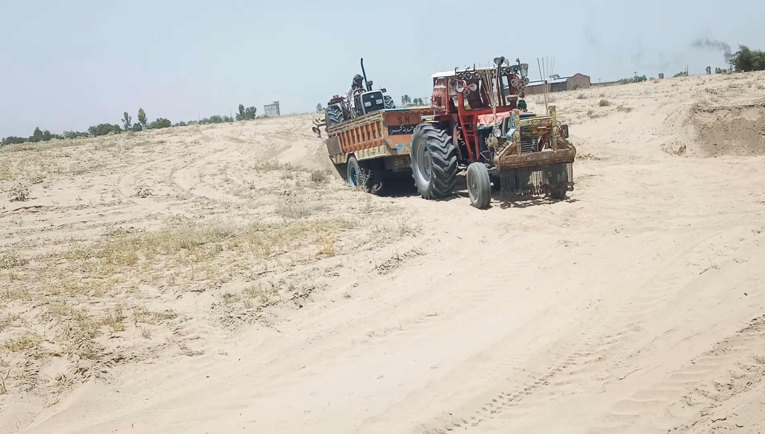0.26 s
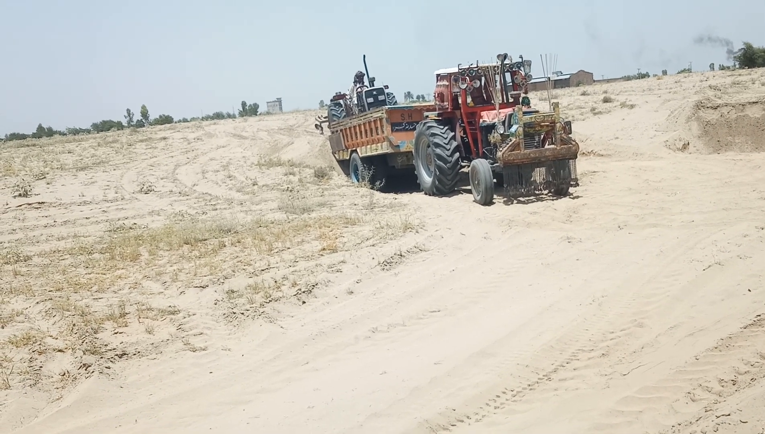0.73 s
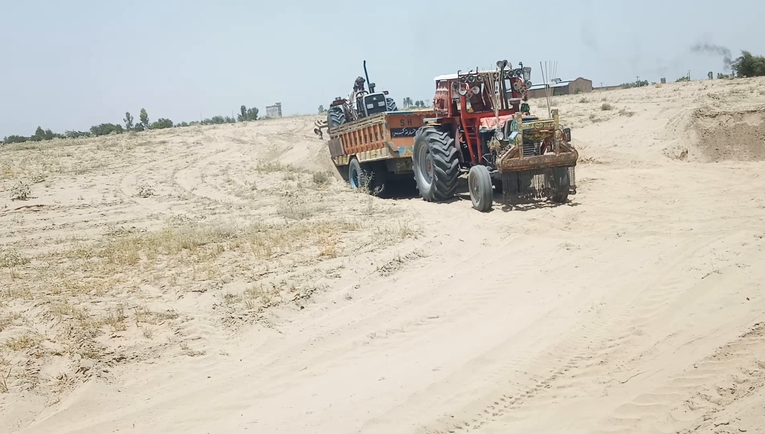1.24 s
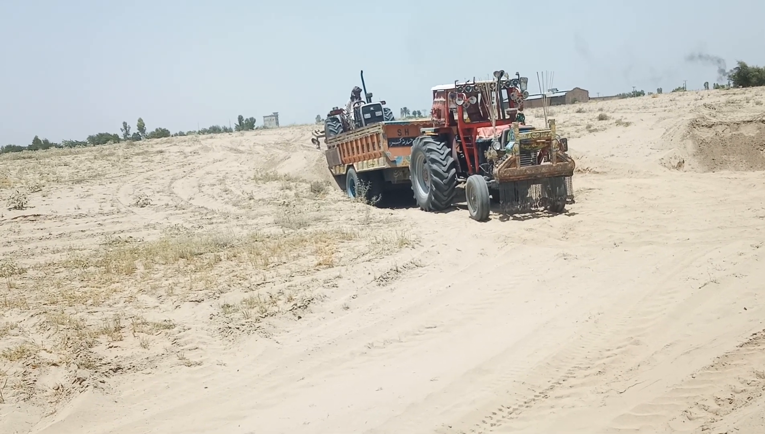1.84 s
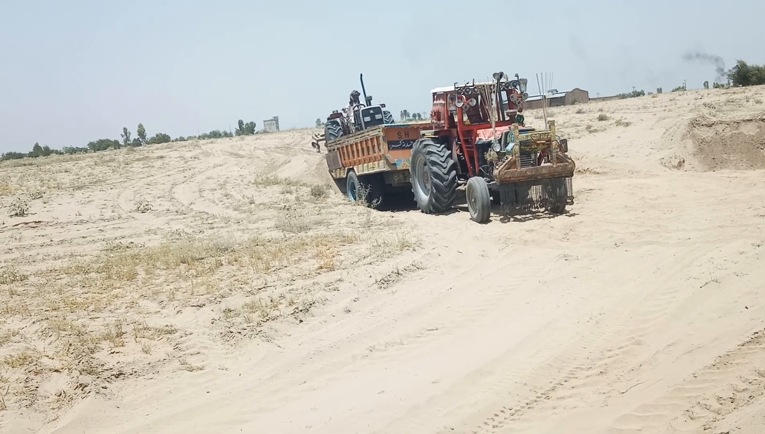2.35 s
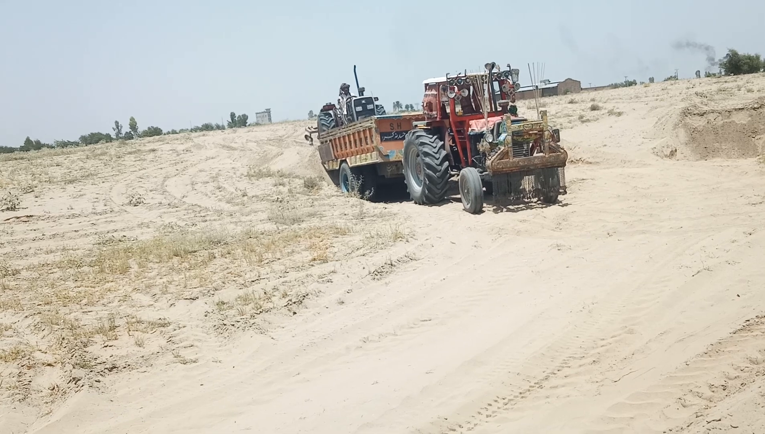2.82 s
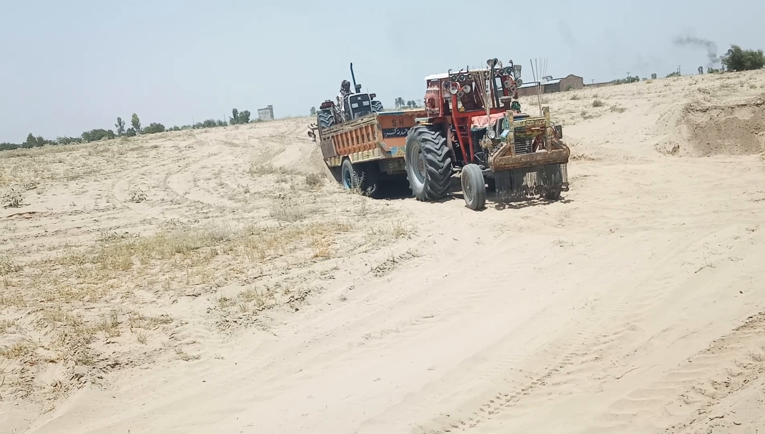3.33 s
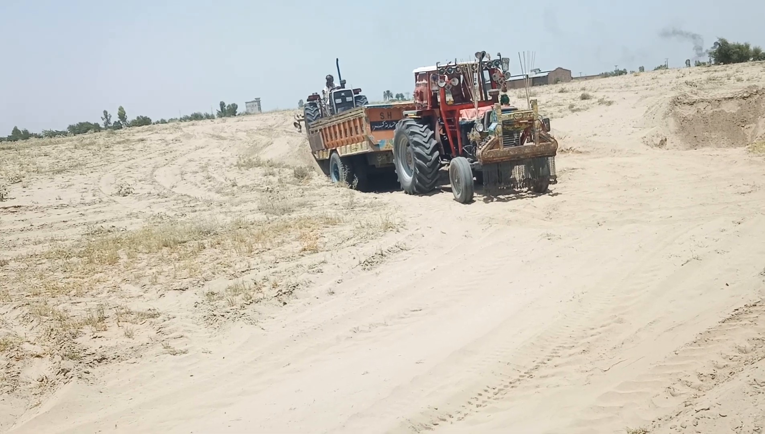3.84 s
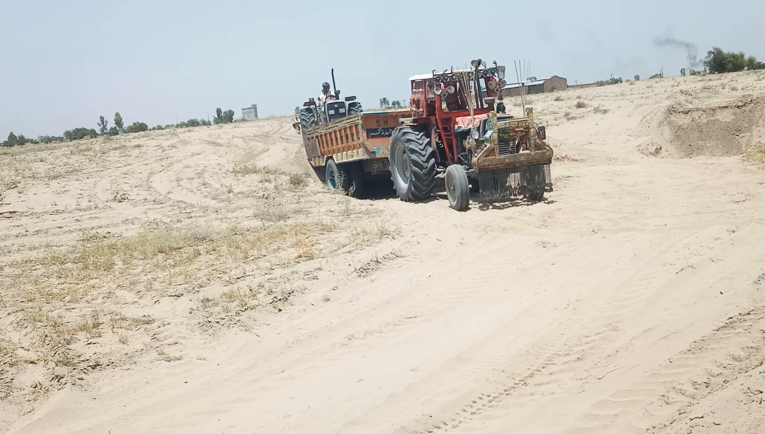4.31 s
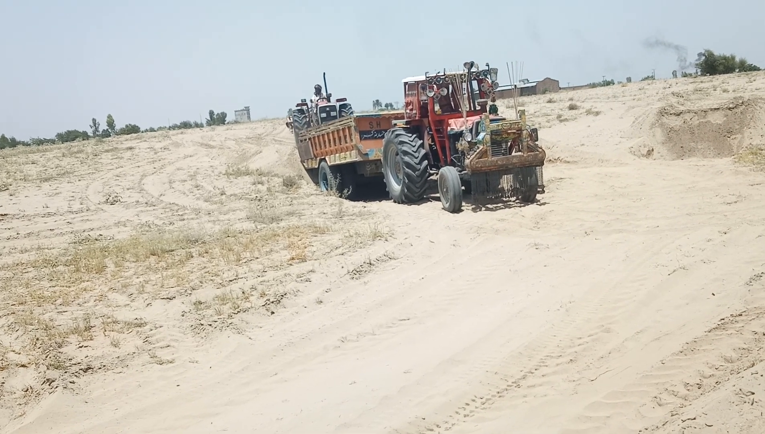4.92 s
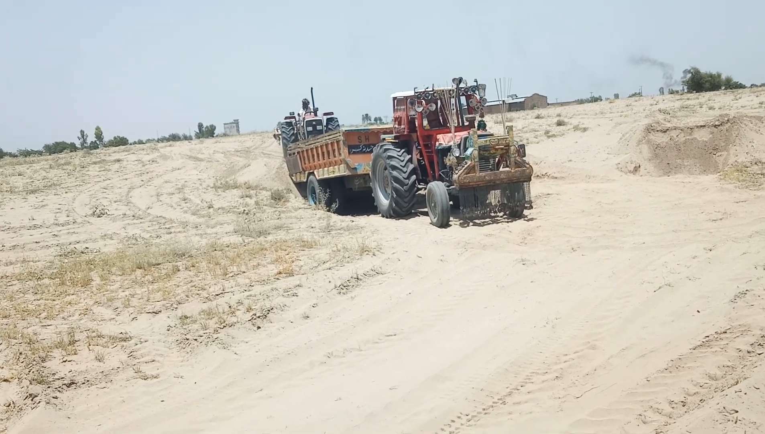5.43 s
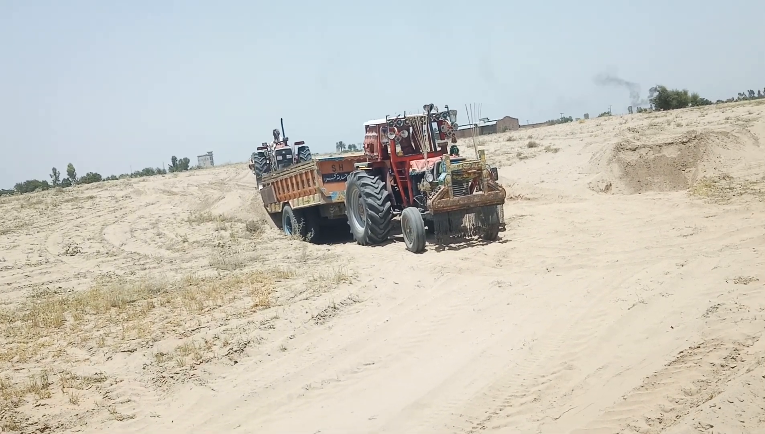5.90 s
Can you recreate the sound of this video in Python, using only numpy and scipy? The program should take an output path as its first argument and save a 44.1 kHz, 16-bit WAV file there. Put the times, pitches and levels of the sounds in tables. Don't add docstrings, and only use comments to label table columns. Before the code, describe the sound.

Gusts of wind batter a dull microphone while a diesel tractor chugs and clatters some way off, bogging down, then picking up speed.

```python
import sys
import numpy as np
from scipy import signal
from scipy.fft import rfft, irfft, next_fast_len
from scipy.io import wavfile
from scipy.ndimage import uniform_filter1d

SR = 44100
rng = np.random.default_rng(int(sys.argv[2]) if len(sys.argv) > 2 else 0)


def wav_out(sig):
    wavfile.write(sys.argv[1], SR, np.round(np.clip(np.atleast_2d(sig).T, -1, 1) * 32767).astype(np.int16))


def voltage_ratio(decibels):
    exponent = np.asarray(decibels, float) / 20
    return 10 ** exponent


N = 271656
T = np.arange(N) / SR


def evened(x):
    return x / np.sqrt(np.mean(x ** 2) + 1e-20)


def curves(rows):
    s, *columns = np.transpose(rows)
    return [np.interp(T, s, c) for c in columns]


def colour(x, points):
    size = next_fast_len(N + 8192)
    hz, db = np.transpose(points)
    bins = np.fft.rfftfreq(size, 1 / SR)
    gain = voltage_ratio(np.interp(np.log(bins + 1), np.log(hz + 1), db))
    return irfft(rfft(x, size) * evened(gain), size)[:N]


def wobble(seconds):
    span = max(int(seconds * SR), 1)
    return evened(uniform_filter1d(uniform_filter1d(rng.standard_normal(N), span), span))


def add(mix, s, sound):
    part = mix[max(round(s * SR), 0):][:len(sound)]
    part += sound[:len(part)]


def peak(x, hz, width):
    return signal.lfilter(*signal.iirpeak(hz, hz / width, SR), x)


def bursts(rows, rise_db_per_s, sag_db_per_s, fall_db_per_s):
    power = np.zeros(N)
    for s, hold, db in rows:
        since = T - s
        rise_db = rise_db_per_s * np.maximum(-since, 0)
        sag_db = sag_db_per_s * np.maximum(since, 0)
        fall_db = fall_db_per_s * np.maximum(since - hold, 0)
        power += voltage_ratio(db - rise_db - sag_db - fall_db) ** 2
    return np.sqrt(power)


def steadied(x, seconds, share):
    span = max(int(seconds * SR), 1)
    power = uniform_filter1d(uniform_filter1d(x ** 2, span), span)
    return evened(x / (abs(power) + 1e-3) ** (share / 2))


def gusts():
    # (start [s], hold [s], buffeting [dB], bright edge relative to it [dB])
    gust_rows = [(-.01, 0.031, -25.5, -24), (0.304, .04, -36, -2), (0.343, 0.11, -23.5, -11),
                 (0.452, 0.059, -26.5, -14), (0.523, 0.3, -31, -21), (0.774, 0.063, -19.5, -11.5),
                 (0.831, 0.031, -17.5, -4.5), (0.93, 0.12, -12.5, -4), (1.1, 0.017, -26.5, 12),
                 (1.148, 0.078, -17.5, 0.5), (1.269, 0.043, -16.5, -15), (1.362, 0.054, -15, -5.5),
                 (1.434, 0.037, -16, 0), (1.527, 0.035, -17, 4.5), (1.583, 0.041, -17.5, -3),
                 (1.642, 0.029, -13.5, 1.5), (1.735, 0.016, -12, -16), (1.788, 0.12, -15, 2),
                 (1.936, 0.06, -15.5, -3), (2.063, 0.043, -16, -20), (2.107, 0.045, -24.5, -5.5),
                 (2.214, 0.13, -17, -14.5), (2.384, 0.05, -23.5, -33), (2.494, 0.071, -18.5, -20),
                 (2.588, 0.093, -26, -16), (2.716, 0.063, -23, -7), (2.868, 0.17, -33, -13),
                 (2.901, 0.0089, -46, -6), (3.12, 0.037, -31, -24), (3.188, 0.034, -22.5, -22)]
    # (frequency [Hz], level [dB])
    rumble = [(15, -58.5), (36, -55), (60, -6), (100, 3), (200, 2.5), (300, -4), (450, -18), (700, -74)]
    # (frequency [Hz], level [dB])
    edge_colour = [(150, -23.5), (310, 4), (420, 0), (630, -6), (900, -22), (1150, -26.5), (1600, -60)]
    low_rows = [(s, hold, db) for s, hold, db, edge_db in gust_rows]
    edge_rows = [(s, hold, db + edge_db) for s, hold, db, edge_db in gust_rows]
    level = bursts(low_rows, rise_db_per_s=902, sag_db_per_s=26, fall_db_per_s=551.5)
    edge = bursts(edge_rows, rise_db_per_s=902, sag_db_per_s=57, fall_db_per_s=602)
    breeze = voltage_ratio(-40) * np.clip((4.05 - T) / 0.79, 0, 1)
    eddies, ripples = evened(voltage_ratio(3.37 * wobble(0.0035))) * rng.standard_normal((2, N))
    low = steadied(colour(eddies, rumble), seconds=0.0085, share=0.42)
    bright = steadied(colour(0.5 * eddies + ripples, edge_colour), seconds=0.016, share=0.11)
    dull = signal.sosfilt(signal.butter(4, 260, fs=SR, output="sos"), low)
    return voltage_ratio(-7.0) * (level * low + breeze * dull) + voltage_ratio(-5.0) * edge * bright


def buffets():
    # (middle [s], peak [dB], pitch [Hz], half length [s])
    strong = [(0.787, -17, 129, 0.0075), (0.832, -17.5, 116, 0.017), (0.834, -21, 208, 0.019),
              (0.888, -17, 140, 0.023), (0.889, -16.5, 103, 0.0082), (0.904, -11.5, 178, 0.006),
              (0.929, -10.5, 350, 0.0029), (0.941, -16, 203.5, 0.061), (0.945, -16.5, 334, 0.0052),
              (0.955, -15.5, 243, 0.0082), (0.957, -18.5, 92.3, 0.04), (0.973, -19.5, 256, 0.0081),
              (0.986, -14.5, 159, 0.02), (0.997, -18, 223, 0.018), (1.019, -18.5, 160, 0.0081),
              (1.105, -15, 363, 0.006), (1.108, -6, 217, 0.005), (1.121, -12, 202, 0.0079),
              (1.122, -16, 418, 0.0069), (1.154, -9, 197, 0.0088), (1.155, -14, 403, 0.0095),
              (1.173, -27, 234, 0.0051), (1.195, -14, 274, 0.012), (1.196, -16, 192, 0.012),
              (1.215, -20, 233, 0.018), (1.316, -11, 148, 0.0062), (1.368, -18.5, 194, 0.0082),
              (1.379, -23, 118, 0.026), (1.388, -11, 200, 0.0096), (1.48, -24, 121, 0.017),
              (1.444, -21.5, 406, 0.012), (1.446, -19, 150, 0.0059), (1.456, -20.5, 256, 0.015),
              (1.456, -15.5, 369, 0.0089), (1.532, -19, 93, 0.013), (1.532, -3.5, 211, 0.0051),
              (1.54, -9.5, 460, 0.0036), (1.544, -15, 176, 0.006), (1.546, -16.5, 311, 0.0048),
              (1.568, -16.5, 185, 0.016), (1.575, -15.6, 266, 0.009), (1.591, -17, 135.5, 0.019),
              (1.602, -12, 260, 0.0051), (1.611, -19, 108, 0.019), (1.646, -18, 150, 0.0045),
              (1.653, -22, 377, 0.0074), (1.663, -20.5, 445, 0.015), (1.67, -13.5, 300, 0.0067),
              (1.675, -10, 192, 0.0071), (1.72, -28, 138, 0.06)]
    # (middle [s], peak [dB], pitch [Hz], half length [s])
    late = [(1.745, -14, 235, 0.011), (1.748, -10, 142, 0.01), (1.787, -13.5, 306, 0.0061),
            (1.799, -17, 211, 0.022), (1.8, -18.5, 118, 0.033), (1.81, -20, 355, 0.019),
            (1.812, -13.5, 96.5, 0.022), (1.816, -16.5, 271, 0.024), (1.821, -22, 167.4, 0.024),
            (1.845, -20, 257, 0.0053), (1.853, -17.5, 303, 0.0075), (1.873, -22, 473, 0.017),
            (1.89, -18.5, 192, 0.012), (1.919, -20.5, 104, 0.057), (1.921, -31, 127, 0.023),
            (1.94, -20, 259, 0.026), (1.953, -16, 207, 0.003), (1.969, -15, 327, 0.013),
            (1.973, -19, 187, 0.019), (1.976, -17.5, 127.4, 0.036), (2.015, -18.5, 205, 0.0092),
            (2.033, -17, 110, 0.0069), (2.099, -16, 295, 0.0051), (2.103, -9.5, 208, 0.0039),
            (2.11, -27, 103.4, 0.009), (2.145, -19.5, 175, 0.014), (2.206, -19.5, 199, 0.0083),
            (2.239, -25, 115, 0.0066), (2.247, -17, 158, 0.0053), (2.266, -14, 176, 0.0083),
            (2.321, -28, 91, 0.062), (2.324, -22, 122.6, 0.066), (2.327, -16, 204, 0.005)]
    # (middle [s], peak [dB], pitch
    # [Hz], half length [s])
    light = [(0.367, -19, 256, 0.0073), (0.386, -24.5, 352, 0.0084), (0.393, -24, 150, 0.0045),
             (0.399, -21, 240, 0.011), (0.427, -22.5, 230, 0.0075), (0.44, -20.4, 176, 0.0048),
             (0.627, -32, 131, 0.0065), (2.491, -27, 176, 0.0055), (2.514, -23, 232, 0.014),
             (2.528, -19.5, 304, 0.007), (2.536, -18, 150, 0.017), (2.545, -19, 82, 0.018),
             (2.548, -27, 374, 0.0074), (2.597, -20, 192, 0.0084), (2.601, -15, 129, 0.01),
             (2.634, -27, 98, 0.045), (2.707, -16, 158, 0.007), (2.731, -22, 108, 0.029),
             (2.738, -22, 148, 0.006), (2.762, -24.5, 157.6, 0.034), (2.806, -24, 97, 0.019),
             (2.809, -18.5, 203, 0.0048), (2.899, -29, 150, 0.0052), (2.933, -30, 126, 0.016),
             (3.028, -20, 113, 0.0093), (3.079, -24.5, 103, 0.0091), (3.136, -27.5, 84, 0.025),
             (3.203, -33, 220, 0.0026), (3.218, -27.5, 142, 0.022), (3.229, -24.5, 94, 0.0081),
             (3.302, -26.5, 103, 0.0059), (3.44, -29.5, 88, 0.012),
             (.02, -33.5, 200, 0.0035),
        (.297, -26.5, 170, 0.0072),
        (0.312, -29.5, 590, 0.0074),
        (0.324, -27.5, 670, 0.0069),
        (1.055, -25, 72, 0.029),
        (3.711, -39, 105.4, 0.015),
    ]
    rows = strong + late + light
    out, t = np.zeros(N), np.arange(-4000, 4000) / SR
    for (s, db, hz, length), start in zip(rows, rng.random(len(rows))):
        turn = 2 * np.pi * (hz * t + start)
        swing = np.sin(turn) - 0.11 * np.cos(2 * turn)
        add(out, s + t[0], voltage_ratio(db - 1.2) * swing * np.exp(-(t / length) ** 2))
    return out


def wind():
    deep_cut = signal.butter(3, 48, "high", fs=SR, output="sos")
    return signal.sosfilt(deep_cut, gusts() + buffets())


def pops():
    # (time [s], peak [dB], width [s])
    pop_rows = [
        (1.102, -22, 0.00076),
        (1.522, -11.5, 0.00053),
        (1.75, -21, 0.00049),
        (2.099, -13.5, 0.00062),
        (2.907, -23.5, 0.00046),
        (3.127, -25.5, 0.0009),
    ]
    out, t = np.zeros(N), np.arange(-200, 200) / SR
    for s, db, width in pop_rows:
        swing = np.sqrt(np.e) * t / width * np.exp(-(t / width) ** 2 / 2)
        add(out, s + t[0], -voltage_ratio(db) * swing)
    return out


def bird():
    # (time [s], length [s], start pitch [Hz], end pitch [Hz], level [dB])
    chirp_rows = [
        (0.198, 0.056, 4150, 4300, -46),
        (0.457, 0.065, 4040, 4450, -48.5),
        (0.706, 0.079, 4050, 4370, -52),
        (1.36, 0.023, 5870, 6140, -71),
        (1.608, .022, 5760, 6460, -68.5),
    ]
    out = np.zeros(N)
    for s, length, start_hz, end_hz, db in chirp_rows:
        count = int(length * SR)
        turns = np.cumsum(np.linspace(start_hz, end_hz, count)) / SR
        add(out, s, voltage_ratio(db) * np.sin(2 * np.pi * turns) * signal.windows.tukey(count, 0.6))
    return out


def sand():
    # (start [s], hold [s], level [dB])
    crunch_rows = [
        (.3, .05, -34),
        (.352, 0.024, -26),
        (.38, 0.046, -25),
    ]
    # (frequency [Hz], level [dB])
    crunch_colour = [(300, -27), (500, 3), (800, 0), (1150, -6), (1600, -5.5), (2200, -16.5), (2900, -8.5),
                     (3600, -9), (4400, -26), (4800, -50), (6400, -47.5), (9000, -68)]
    # (start [s], hold [s], level [dB])
    spray_rows = [
        (.07, 0.079, -42.5),
        (.97, 0.076, -34),
        (1.075, 0.15, -39),
        (1.45, 0.17, -46),
        (1.862, 0.015, -47),
    ]
    # (frequency [Hz], level [dB])
    spray_colour = [(900, -24.5), (1500, -10), (2250, -9.5), (2900, 0), (3500, 4.5), (4200, -6),
                    (4800, -32), (5400, -38), (6500, -38.5), (9000, -62)]
    grains = evened(voltage_ratio(0.45 * wobble(0.00054) + 0.88 * wobble(0.012)) * rng.standard_normal(N))
    fine = evened(voltage_ratio(1.2 * wobble(0.0025) + 1.3 * wobble(0.0053)) * rng.standard_normal(N))
    crunch = bursts(crunch_rows, 1200, 60, 220) * grains / np.sqrt(2)
    spray = bursts(spray_rows, 800, 33, 300) * fine
    return colour(crunch, crunch_colour) + colour(spray, spray_colour)


def hitch_pin():
    # (time [s], peak [dB])
    jolt_rows = [
        (1.862, -45),
        (1.904, -50),
        (1.918, -55),
    ]
    # (frequency [Hz], level [dB], time to fall 60 dB [s])
    pin = [(4690, 1.5, 0.055), (4750, -4, .04), (6300, -16, 0.053), (7000, -14.5, .05)]
    out, t = np.zeros(N), np.arange(2000) / SR
    ring = sum(voltage_ratio(db - 60 * t / t60) * np.sin(2 * np.pi * hz * t) for hz, db, t60 in pin)
    for (s, db), chatter in zip(jolt_rows, rng.standard_normal((len(jolt_rows), 300))):
        knocking = chatter * np.hanning(len(chatter)) / 10
        add(out, s - 0.002, voltage_ratio(db) * signal.convolve(ring, knocking))
    return out


def injector_clicks():
    # (time [s], peak [dB])
    click_rows = [(2.4816, -66), (2.5176, -61), (2.6812, -64.5), (2.8097, -63.5), (2.858, -60),
                  (2.9967, -57), (3.0364, -50), (3.0813, -54), (3.1237, -54), (3.165, -58), (3.209, -67),
                  (3.5703, -64), (3.3277, -66.5), (3.3651, -58.5), (3.4006, -66.5), (3.4345, -65.5),
                  (3.4659, -65), (3.5023, -57), (3.5348, -62), (3.6016, -67), (3.631, -58), (3.7553, -63),
                  (4.347, -64), (4.4344, -65), (4.711, -63), (5.068, -64), (5.310, -66), (5.4007, -67),
                  (5.4276, -64), (5.5424, -67)]
    # (frequency [Hz], level [dB])
    click_colour = [(4700, -30), (5600, -4), (6300, 4), (7200, -1), (9500, -4), (12000, -13), (13500, -12),
                    (15000, -24)]
    gate, t = np.zeros(N), np.arange(900) / SR
    for s, db in click_rows:
        add(gate, s - 0.0006, voltage_ratio(db - 4.0) * (t / 0.0041) ** 2 * np.exp(2 - t / 0.0017))
    return colour(gate * rng.standard_normal(N), click_colour)


def part_rings():
    # (time [s], peak [dB], pitch [Hz], time to fall 60 dB [s])
    ring_rows = [(3.469, -25, 3380, 0.048), (3.505, -30, 3400, 0.041), (4.33, -41, 1550, .1),
                 (5.07, -31, 3400, .06), (5.099, -37, 1545, 0.074), (5.573, -39, 1585, .12),
                 (5.808, -35, 1470, .1), (5.8, -41, 301.4, 0.38), (6.043, -35, 1590, 0.085),
                 (6.107, -42, 1522, 0.17), (3.04, -57, 6150, .035), (3.29, -59, 6200, .035),
                 (3.502, -51, 6200, .035), (3.535, -58, 6800, .04), (3.6, -59, 6350, .04)]
    out, t = np.zeros(N), np.arange(9000) / SR
    for s, db, hz, t60 in ring_rows:
        soft_start = 1 - np.exp(-t / 0.0033)
        add(out, s, voltage_ratio(db - 60 * t / t60) * soft_start * np.sin(2 * np.pi * hz * t))
    return out


def leak_ticks():
    # (time [s], peak [dB], middle pitch [Hz])
    tick_rows = [(.7706, -32, 3890), (0.808, -29.5, 3880), (0.8784, -33.5, 3930), (1.817, -33, 3990),
                 (1.86, -33, 4170), (1.904, -31, 3970), (2.229, -25, 3895), (2.516, -32, 3830),
                 (2.6428, -26.5, 4040), (2.688, -25, 3980), (2.814, -23, 4200), (2.952, -24, 4220),
                 (2.9946, -23.5, 4300), (3.0435, -27.5, 4250), (3.0879, -24.5, 4190), (3.1273, -24, 4280),
                 (3.209, -25, 4030), (3.439, -25, 4190), (3.6376, -32, 4380), (3.727, -30, 4230),
                 (3.847, -31, 4120), (3.996, -28, 4200), (4.466, -25, 4070), (4.586, -30.5, 4080),
                 (4.7074, -25, 4180), (4.828, -31, 4250), (4.919, -32, 4300), (4.9477, -32, 4330),
                 (5.0683, -25, 4250)]
    out, t = np.zeros(N), np.arange(1500) / SR
    for s, db, hz in tick_rows:
        turns = np.cumsum(hz * (0.955 + 0.076 * np.exp(-t / 0.01))) / SR
        swell = (t / 0.003) * np.exp(1 - t / 0.0032)
        add(out, s - 0.001, voltage_ratio(db - 7.0) * np.sin(2 * np.pi * turns) * swell)
    return out


def leak_whistle(load_db, plain, firing, since, chance):
    # (time [s], relative level [dB], end pitch [Hz])
    leak = [(0, -17, 3950), (2.2, -14, 3950), (2.9, -9, 4080), (4.2, -8.5, 4080), (5.1, -8, 4120),
            (5.5, -12, 4250), (6.16, -13, 4300)]
    cylinder_db = [-3, 0.5, 2.5, 3]
    leak_db, leak_hz = curves(leak)
    chance_db = np.take(cylinder_db, firing % 4) + 2 * chance[firing, 1]
    hz = leak_hz + 70 * chance[firing, 2] + 560 * np.exp(-since / 0.005)
    level = voltage_ratio(load_db + leak_db + chance_db + 2.2 * wobble(0.0019))
    return level * plain * np.sin(2 * np.pi * np.cumsum(hz) / SR)


def block_knocks(puffs, firing):
    # (frequency [Hz], width [Hz], level [dB])
    block = [(754, 130, -9), (1443, 150, -10.5), (2940, 65, -14), (3400, 260, -9.5)]
    share_db = 4.5 * rng.standard_normal((200, len(block)))
    out = np.zeros(N)
    for k, (hz, width, db) in enumerate(block):
        drive = puffs * voltage_ratio(share_db[firing, k])
        out += voltage_ratio(db) * np.sqrt(SR / width) * peak(drive, hz, width) / 2
    return out


def panels(x):
    # (frequency [Hz], width [Hz], level [dB])
    panel_rows = [(515, 11, -31), (735.6, 21, -14), (902, 26, -13), (980, 43, -17), (1314, 63, -12),
                  (1640, 9, -17), (2830, 10, -28), (2983, 9.9, -14.5), (3404, 38, -15.5), (3246, 27, -14.5),
                  (3990, 10, -18.5)]
    drift_db, apart = 5.1 * wobble(0.052), N // len(panel_rows)
    out = np.zeros(N)
    for k, (hz, width, db) in enumerate(panel_rows):
        drive = x * voltage_ratio(np.roll(drift_db, k * apart))
        out += voltage_ratio(db - 1.5) * np.sqrt(SR / width) * peak(drive, hz, width) / 2
    return out


def resonate(x, hz, width):
    turn = np.exp(2j * np.pi * np.cumsum(hz * np.ones(N)) / SR)
    r = np.exp(-np.pi * width / SR)
    return np.sqrt(SR / width) * (turn * signal.lfilter([1 - r], [1, -r], x / turn)).real


def bonnet(x):
    # (time [s], pitch [Hz], level [dB], side panel level [dB])
    bonnet_rows = [(0, 1640, -25, -12), (2.6, 1655, -13.5, -10.5), (3.1, 1690, -9, -8.5),
                   (4.05, 1640, -10, -15), (4.3, 1527, -1.5, -15), (4.7, 1627, -20, -23),
                   (5.1, 1540, -1, -13), (5.3, 1500, -17, -25), (5.5, 1540, -12, -22),
                   (6.16, 1510, -10, -14)]
    hz, db, side_db = curves(bonnet_rows)
    lid = voltage_ratio(db) * resonate(x * voltage_ratio(2.0 * wobble(0.022)), hz, width=38)
    side = voltage_ratio(side_db) * resonate(x * voltage_ratio(1.8 * wobble(0.041)), 1962, width=51)
    return lid + side


def valve_gear(top_db, gate, firing, chance):
    # (frequency [Hz], level [dB])
    bright_colour = [(4400, -30), (4850, 0), (5200, -6), (5500, -11), (5850, -5), (6100, -6), (6400, -1),
                     (6700, -10), (7000, -4), (7400, -10), (8500, -15), (11000, -19), (13500, -23),
                     (15600, -30)]
    # (frequency [Hz], width [Hz], level [dB])
    pings = [(6240, 150, 5), (6940, 88, -0.5), (4600, 150, -11.5)]
    strength = voltage_ratio(2.7 * chance[firing, 2]) * gate ** 1.39 + 0.07
    bright = voltage_ratio(top_db - 6.0) * colour(strength * rng.standard_normal(N), bright_colour)
    return bright + sum(voltage_ratio(db) * peak(bright * voltage_ratio(4.3 * wobble(0.028)), hz, width) for hz, width, db in pings)


def exhaust(speed, crank, knock_db, firing, chance):
    # (frequency [Hz], level [dB])
    pipe = [(33, -16), (52, -9.5), (64, 1.5), (100, 1.5), (135, -4), (170, -4.5), (203, -30.5), (238, -4.5),
            (270, -11.5), (300, -15.5), (350, -33), (450, -41), (600, -50)]
    # (frequency [Hz], level [dB])
    flow = [(25, -28.5), (50, -25.5), (80, -7.5), (160, -3.5), (300, -4), (360, -12.5), (450, -37.5),
            (600, -62)]
    cylinder_db = [-4, -4.5, -4, -.5]
    late = np.floor(crank - 0.2 + 0.032 * chance[firing, 1])
    starts = np.diff(late, prepend=late[0]) > 0
    blows = -voltage_ratio(np.take(cylinder_db, firing % 4) + 1.4 * chance[firing, 2]) * starts
    thump = evened(colour(blows, pipe)) + voltage_ratio(-3) * colour(rng.standard_normal(N), flow)
    drone = voltage_ratio(-14.5 + 4.7 * wobble(0.18)) * np.clip(T - 4.7, 0, 1) * np.sin(2 * np.pi * 9 * crank)
    bog_db = -0.74 * (speed - 30)
    turn_db = 2.5 * np.maximum(T - 5.3, 0)
    return voltage_ratio(-46.5 + bog_db - 0.2 * np.maximum(knock_db, 0) + turn_db) * (thump + drone)


def firing_gates(crank, firing, since, chance):
    cylinder_db = [-0.93, 0.68, 0, 1.4]
    # (time [s], extra level [dB])
    hard = [(.6, 4.5), (1.822, 12.5), (1.868, 10.5), (1.91, 15), (1.953, 8.5), (3.25, -3.5), (3.51, 1.5),
            (4.35, 6.5), (4.47, 7), (4.95, 7), (5.31, 3.5), (5.665, 5.5), (5.07, 6.5), (5.9, 8), (6.02, 8),
            (6.14, 5)]
    size = voltage_ratio(np.take(cylinder_db, firing % 4) + 1.2 * chance[firing, 0])
    gate = size * (since / 0.005) * np.exp(1 - since / 0.006)
    gate = gate / np.sqrt(uniform_filter1d(gate ** 2, SR // 5))
    hard_s, extra_db = np.transpose(hard)
    hard_db = np.zeros(len(chance))
    hard_db[np.round(np.interp(hard_s, T, crank)).astype(int)] = extra_db
    plain = uniform_filter1d(gate, size=300)
    return plain, uniform_filter1d(gate * voltage_ratio(hard_db[firing]), size=300)


def engine():
    # (time [s], clatter [dB], knock relative to it [dB])
    engine_rows = [(0, -45.5, -18), (.14, -41.5, 3), (.3, -42, -4.5), (.45, -42.5, -4), (.7, -45.5, -2),
                   (.84, -41, 1.5), (1.1, -36.5, -12), (1.28, -46, -2), (1.68, -47.5, -6.5), (1.85, -40.5, -8),
                   (2.1, -43.5, -2.5), (2.24, -40.5, -1.5), (2.92, -43, 1), (3.05, -43.5, 5.5), (3.25, -44, 6.5),
                   (3.62, -44, 2.5), (4.1, -44, -2.5), (6.16, -44, -2.5)]
    # (time [s], firings per second [Hz])
    speed_rows = [(0.0, 21.964), (0.24, 29.919), (0.48, 27.271), (0.72, 27.492), (0.96, 30.388),
                  (1.44, 24.49), (1.68, 25.116), (2.16, 23.814), (2.4, 28.816), (2.64, 23.916),
                  (2.88, 21.929), (3.12, 23.199), (3.6, 31.385), (4.08, 34.758), (4.56, 32.844),
                  (6.16, 34.508)]
    # (frequency [Hz], level [dB])
    puff_colour = [(400, -29.5), (750, -0.5), (1150, -12.5), (1550, -5.5), (2000, -10), (2250, -3),
                   (2800, 3), (3150, -9), (3450, 4), (4350, -2), (4750, -23.5), (5200, -70.5)]
    # (frequency [Hz], level [dB])
    clatter = [(250, -15.5), (400, -27), (480, -6.5), (560, 2.5), (760, 5.5), (1130, -3), (1500, 4),
               (1850, -1.5), (2250, -7.5), (2900, 1), (3150, -5), (3500, 4), (4420, -12.5), (4700, -34),
               (5200, -50)]
    steady_db, knock_db = curves(engine_rows)
    speed, = curves(speed_rows)
    crank = -0.32 + np.cumsum(speed) / SR
    chance = rng.standard_normal((200, 3))
    early = crank + 0.26
    firing = np.clip(early.astype(int), 0, None)
    since = (early % 1) / speed
    plain, gate = firing_gates(crank, firing, since, chance)
    whistle = leak_whistle(steady_db + knock_db / 2, plain, firing, since, chance)
    puff_db = steady_db + 1.15 * knock_db
    puffs = voltage_ratio(puff_db - 6.5 + 0.84 * wobble(0.0046)) * gate * rng.standard_normal(N)
    rattle = voltage_ratio(steady_db - 1.5 + 1.56 * wobble(0.0053)) * rng.standard_normal(N)
    body = colour(puffs, puff_colour) + block_knocks(puffs, firing) + whistle + colour(rattle, clatter)
    body = body + panels(0.85 * puffs + 0.64 * rattle) + bonnet(1.1 * puffs + 0.71 * rattle)
    body = body + exhaust(speed, crank, knock_db, firing, chance)
    return body, valve_gear(steady_db - 33.5 + 2.18 * knock_db, gate, firing, chance)


def scene():
    body, top = engine()
    mic_edge = signal.butter(10, 4606, fs=SR, output="sos")
    dulled = signal.sosfiltfilt(mic_edge, body + leak_ticks() + pops() + wind())
    bright = top + part_rings() + injector_clicks() + hitch_pin() + sand() + bird()
    return (dulled + bright)[None]


def top_cut(x):
    return signal.sosfilt(signal.butter(12, 15525, fs=SR, output="sos"), x)


def record(dry):
    # (frequency [Hz], level [dB])
    hiss_colour = [(3600, -30), (4850, 7), (5600, 3), (6400, 5), (7500, 2), (9000, 0), (12000, -1),
                   (15500, -2)]
    loud = np.sqrt(abs(uniform_filter1d(dry[0] ** 2, SR // 10)))
    hiss = voltage_ratio(-75.5) * (1 + 2.1 * loud) * colour(rng.standard_normal(N), hiss_colour)
    treble_cut = signal.butter(12, 15400, fs=SR, output="sos")
    return top_cut(signal.sosfilt(treble_cut, dry) + hiss)


dry = scene()
out = record(dry)
wav_out(out)
```